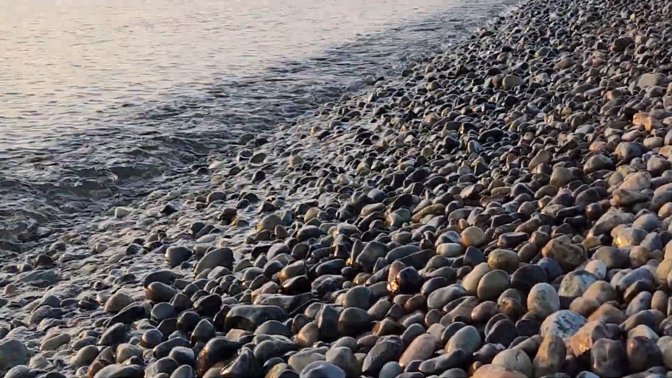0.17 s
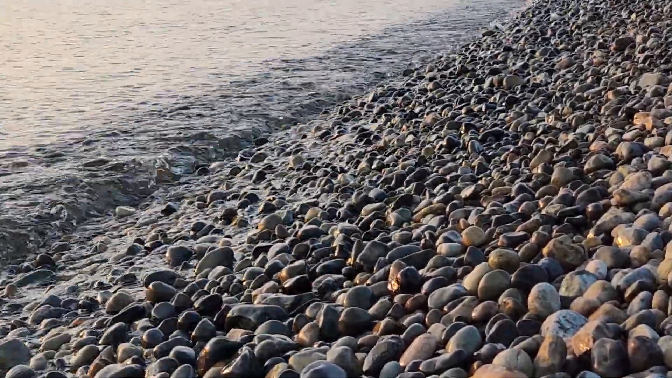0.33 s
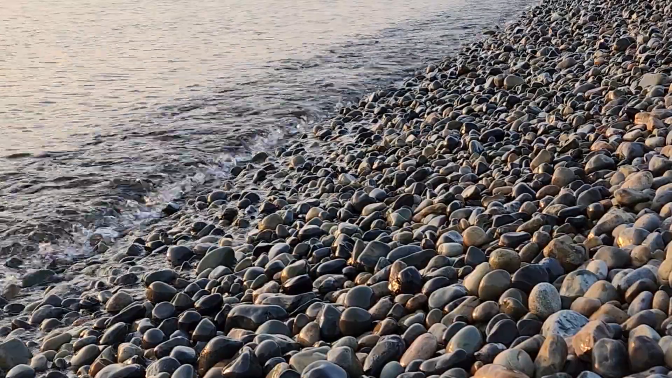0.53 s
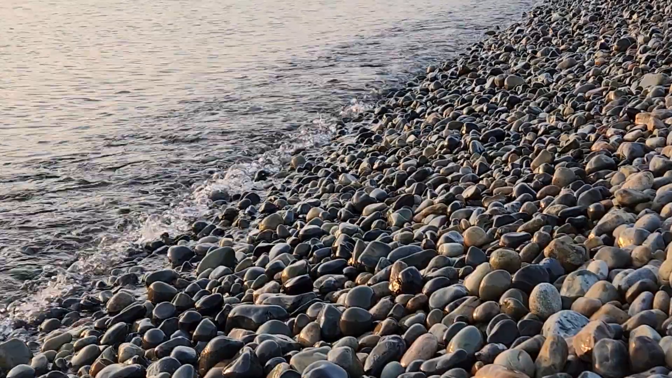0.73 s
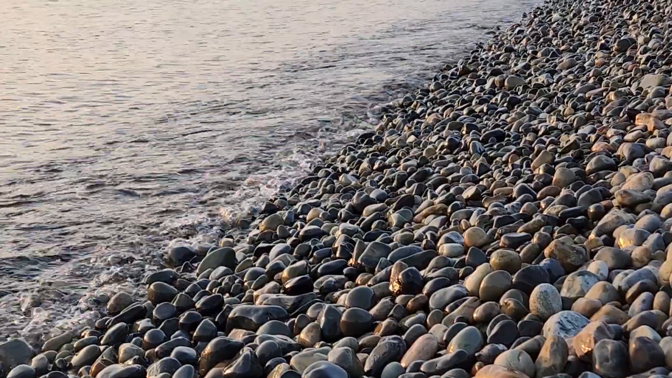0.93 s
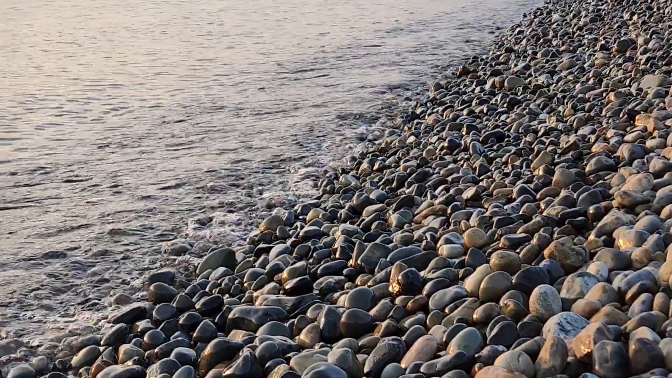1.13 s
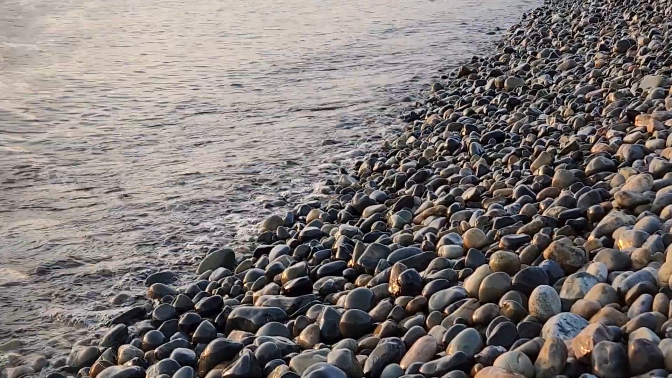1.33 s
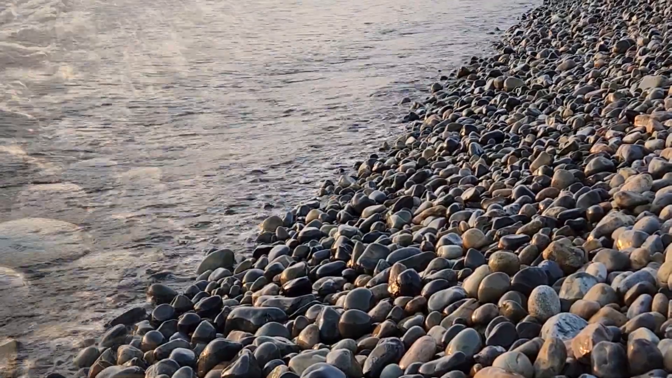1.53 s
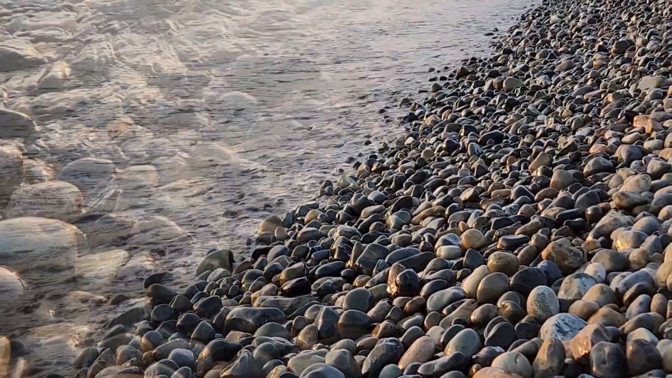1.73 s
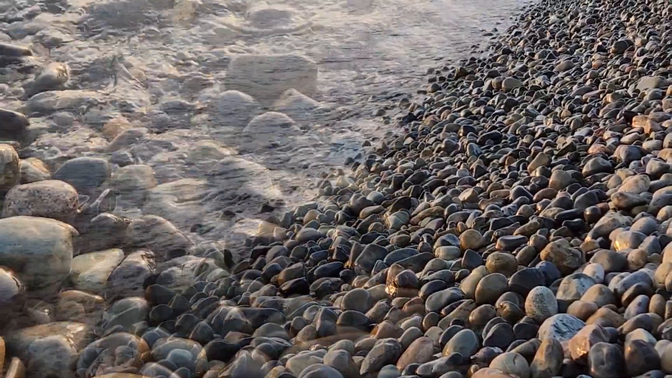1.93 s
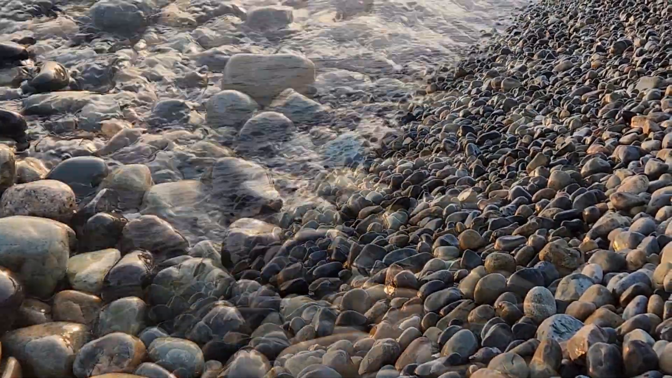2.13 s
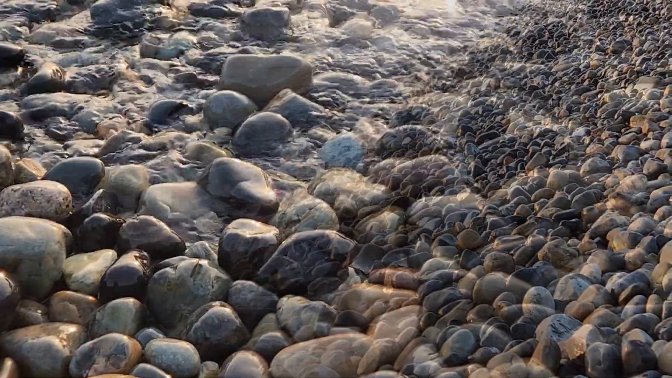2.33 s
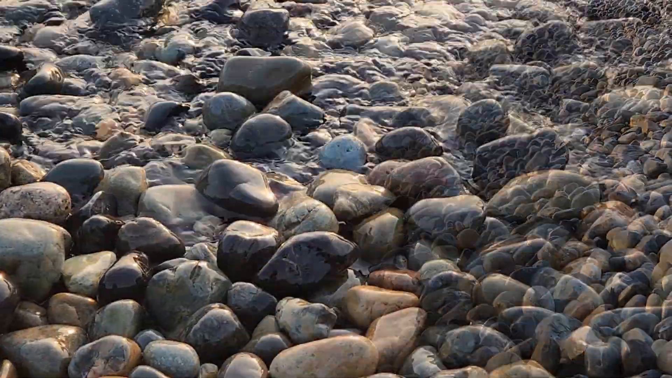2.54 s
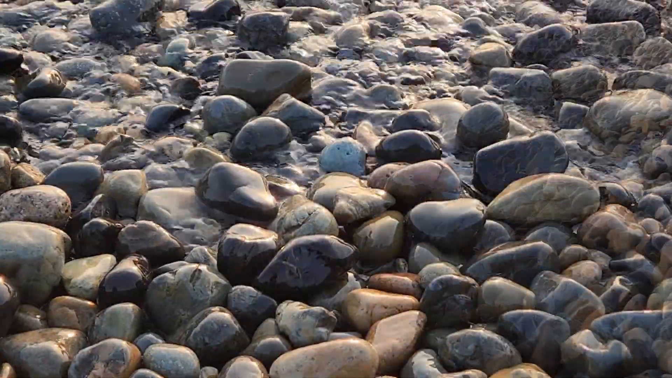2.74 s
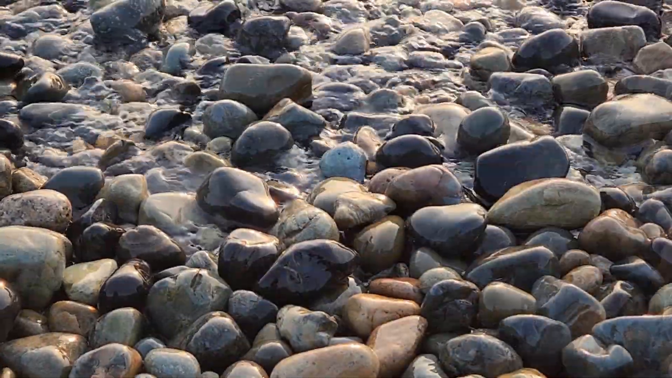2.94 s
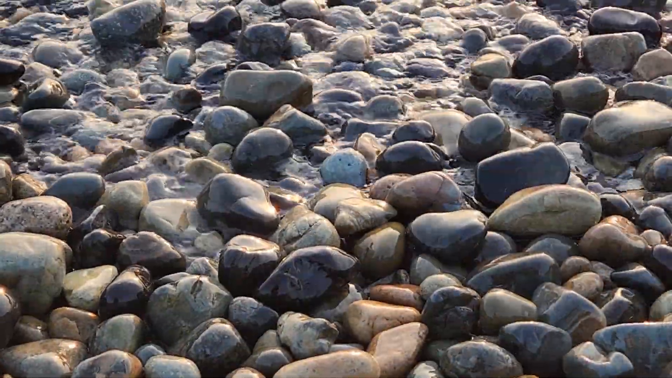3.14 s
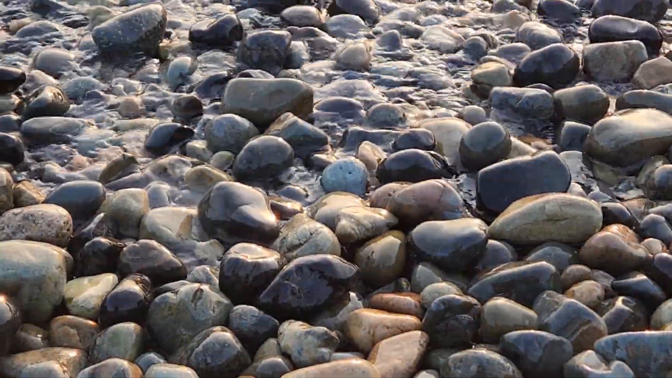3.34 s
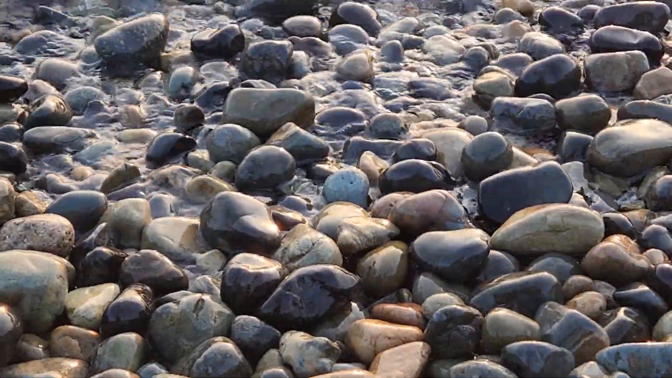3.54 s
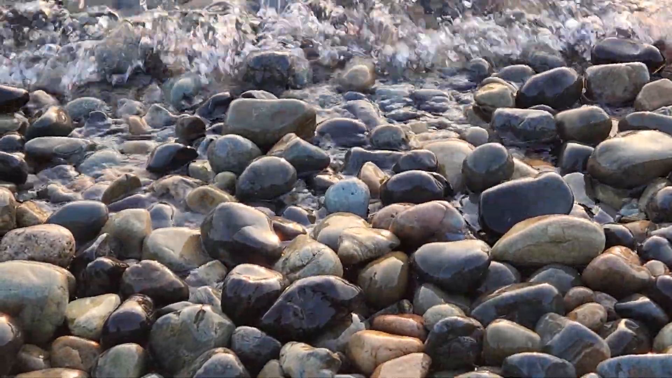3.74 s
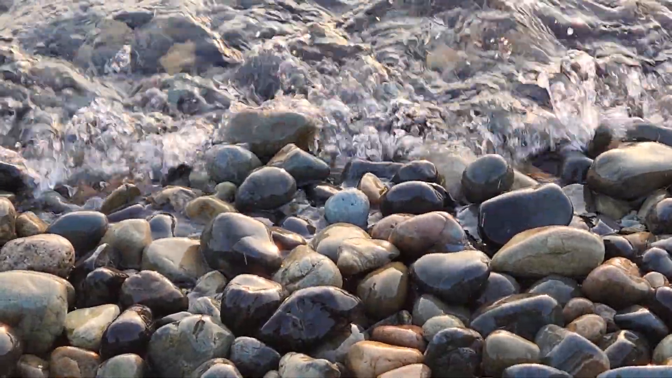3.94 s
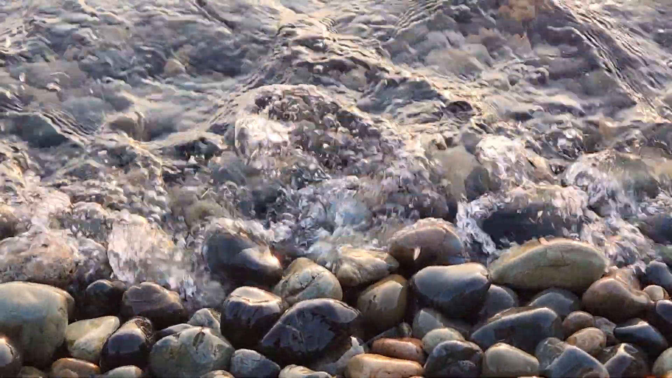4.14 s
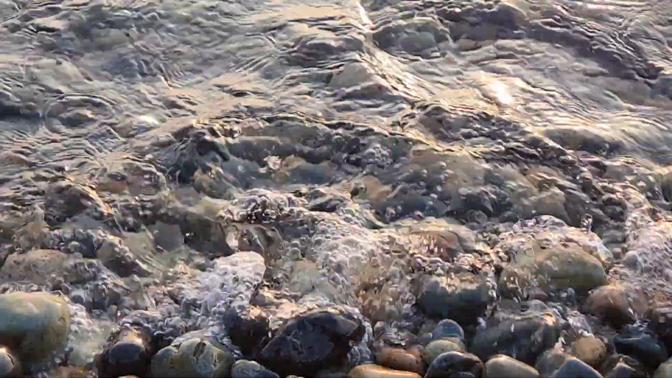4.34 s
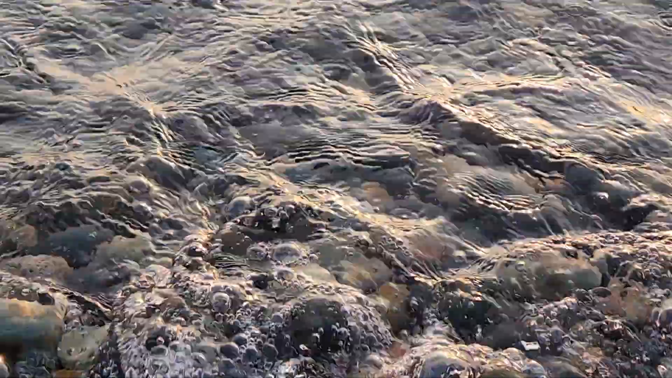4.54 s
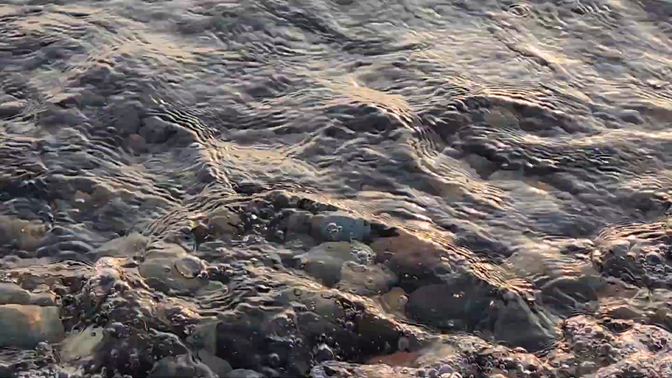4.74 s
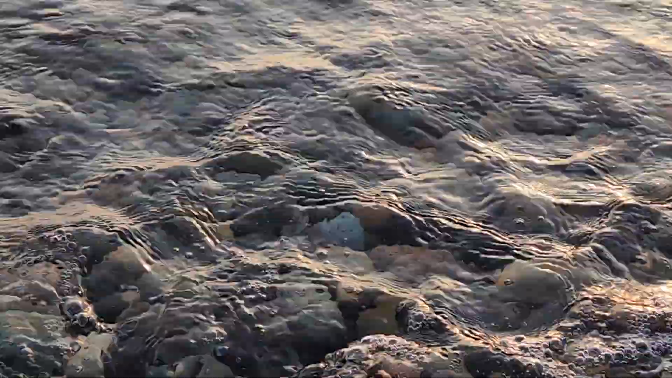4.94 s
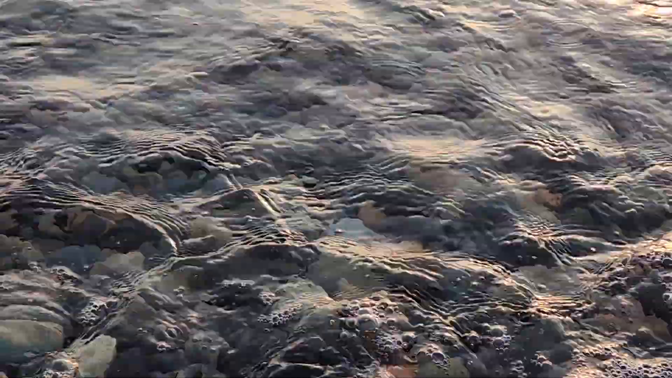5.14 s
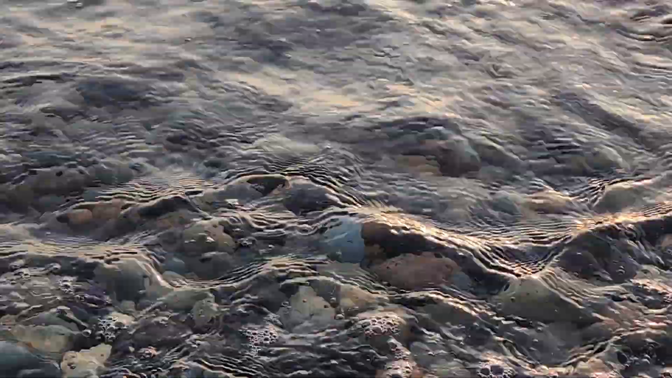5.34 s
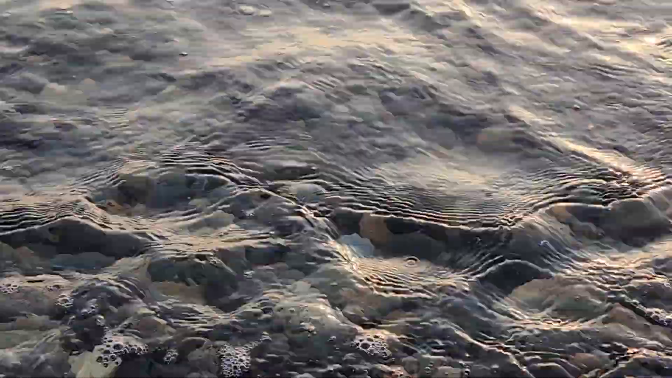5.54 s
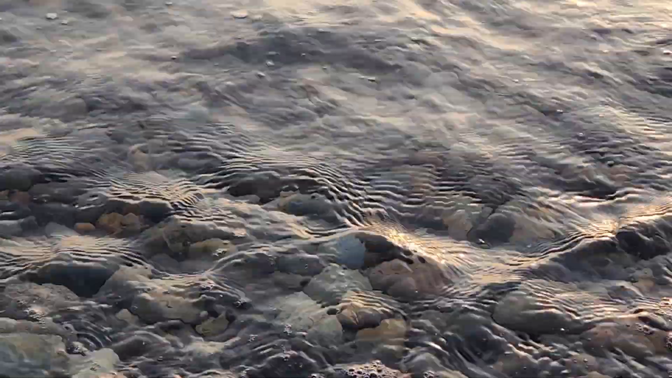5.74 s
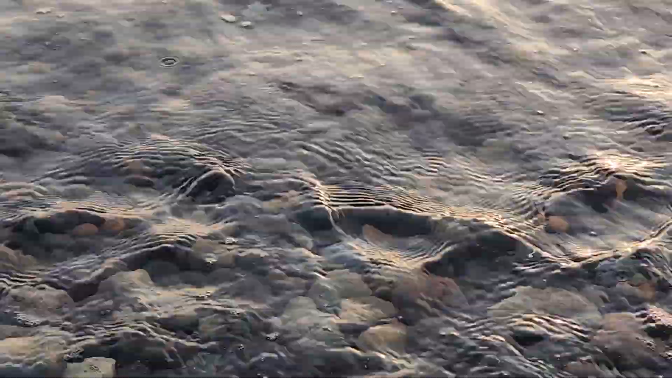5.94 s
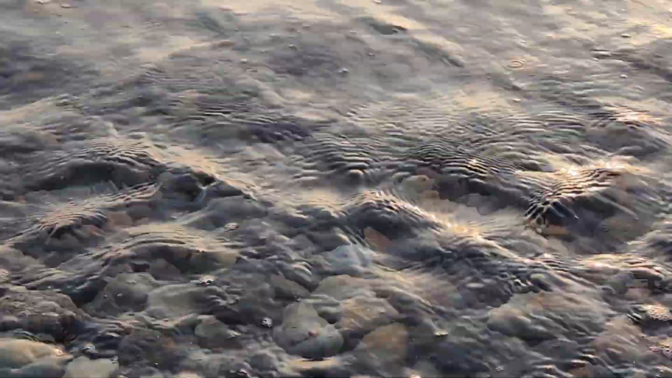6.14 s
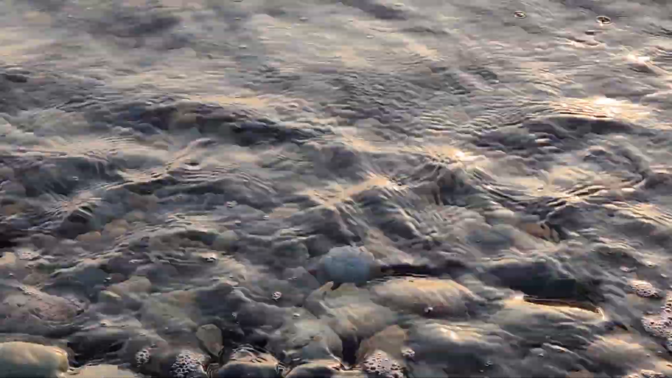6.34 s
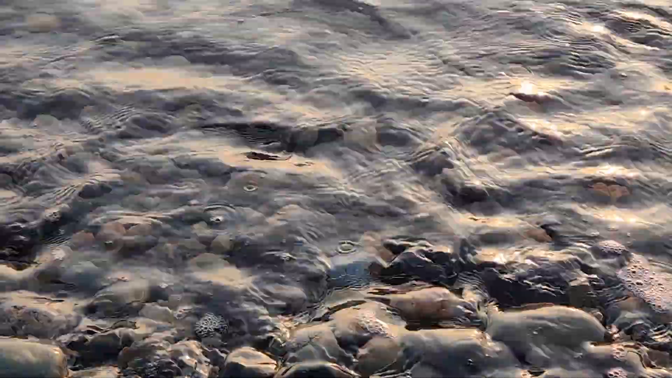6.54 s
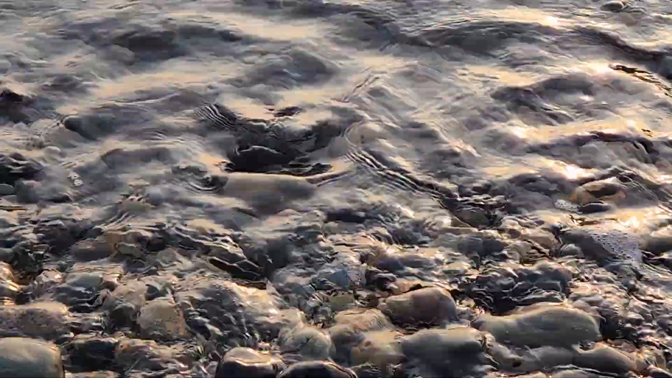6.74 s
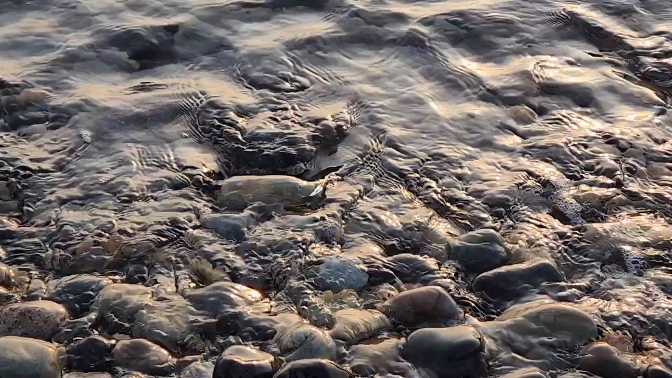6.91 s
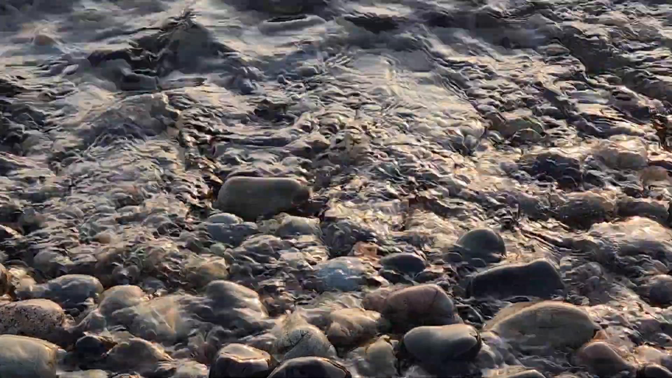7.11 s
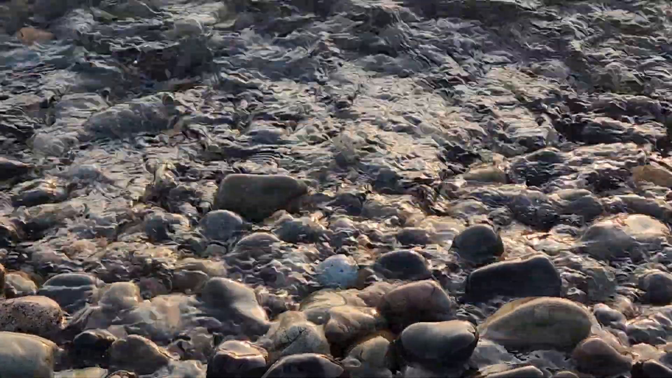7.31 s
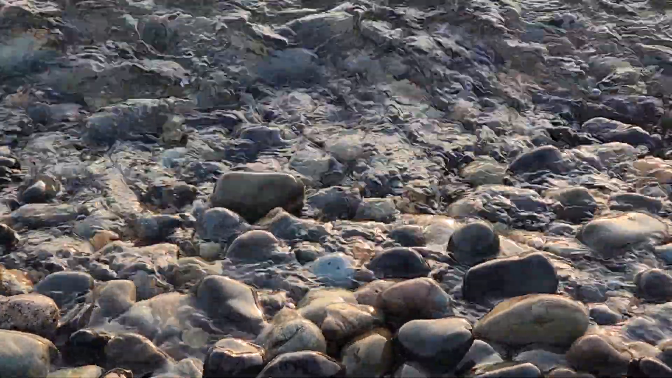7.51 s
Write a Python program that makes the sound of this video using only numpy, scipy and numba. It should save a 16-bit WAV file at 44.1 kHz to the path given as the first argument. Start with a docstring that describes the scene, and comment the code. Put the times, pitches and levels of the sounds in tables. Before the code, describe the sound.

Small waves on smooth stones, heard near the waterline outdoors. First a short bubbling wash, strongest just after half a second, then near quiet over soft rumble. Around three and a half seconds a stronger splash surges up, full of round plops, hard pebble clacks and crisp spray. Foam fizzes and thins out, leaving isolated knocks and a light trickle at the end.

```python
"""Two small waves break on a steep beach of round pebbles, run up and drain back, with far surf and one gust behind them.
Gurgle, fizz and spray are swarms of decaying, upward-gliding sines whose levels follow the waves.
Plops, pebble clacks and spray ticks use the same sines: the loudest at set moments, lesser plops, splashes, ticks by chance.
Far hiss, surf and gust are filtered noise. Two spaced ports pick it all up, with their own delays and responses."""
import sys
import numpy as np
from scipy import signal
from scipy.fft import rfft, irfft, next_fast_len
from scipy.io import wavfile
from scipy.ndimage import uniform_filter1d
from numba import njit

SR = 44100
rng = np.random.default_rng(int(sys.argv[2]) if len(sys.argv) > 2 else 0)


def store_pcm(level_fs):
    """Save levels as 16-bit WAV."""
    pcm = np.round(np.clip(level_fs, -1, 1) * 32767).astype(np.int16)
    wavfile.write(sys.argv[1], SR, np.atleast_2d(pcm).T)


N = 333837
PLOP_T60_S, TICK_S = 0.08, 0.016


def undb(db):
    """Gain of a dB value."""
    return 10 ** (np.asarray(db) / 20)


def unit(x):
    """Scaled to rms 1."""
    return x / np.sqrt(np.mean(x ** 2))


def on_log(table, hz):
    """Reads (f/Hz, level/dB) points on a log-frequency axis."""
    f, db = np.transpose(table)
    return np.interp(np.log(np.maximum(hz, 1)), np.log(f), db)


def colour(x, db_of):
    """Filters by a dB function of frequency."""
    n = next_fast_len(N)
    hz = np.arange(n // 2 + 1) * SR / n
    return irfft(rfft(x, n) * undb(db_of(hz)), n)[..., :N]


def walk(rate_hz):
    """Random levels held 1 / rate_hz s, smoothed by two moving averages; rms 1."""
    k = int(SR / rate_hz)
    steps = np.repeat(rng.standard_normal(N // k + 1), k)
    return unit(uniform_filter1d(uniform_filter1d(steps, k), k)[:N])


@njit
def ring(start, lead, hz, t60_s, rise, left, right, onset_cycles):
    """Sines that build up over onset_cycles, decay and glide up by the share rise; left hears them lead samples early."""
    out = np.zeros((2, N + 64))  # 32 samples of margin each side for the lead
    for g in range(len(start)):
        n = int(t60_s[g] * SR * 0.7)
        w = 2 * np.pi * hz[g] / SR
        step = np.exp(1j * w - np.log(1000) / (t60_s[g] * SR))
        glide = np.exp(1j * w * rise[g] / n)
        fade = np.exp(-hz[g] / SR / onset_cycles)
        z, hush = 1 + 0j, 1.0
        for i in range(start[g], min(start[g] + n, N)):
            z *= step
            step *= glide
            hush *= fade
            y = z.imag * (1 - hush)
            out[0, i + 32 - lead[g]] += left[g] * y
            out[1, i + 32] += right[g] * y
    return out[:, 32:N + 32]


def bearing(s, chance, shore, spread):
    """Lead at the left port in samples: the share shore comes from the busy stretch, the rest from across the front."""
    # bearing of the busiest stretch of shore: t/s, sine of angle to the left [1]
    busy_stretch = [(0, 0.87), (1.2, .91), (1.8, .76), (2.9, .76), (3.4, .88), (5.3, 0.91), (7, 0.87)]
    port_gap_s = 27 / SR
    shore = np.clip(shore, 0, 0.9)
    front = spread * np.cos(np.pi * (chance - shore) / (1 - shore))
    sine = np.where(chance < shore, np.interp(s, *np.transpose(busy_stretch)), front)
    return np.rint(port_gap_s * SR * np.clip(sine, -1, 1)).astype(np.int64)


def swarm(count, shape, cycles, rise, scatter_db, unlike_db, shore, spread):
    """Cloud of bubbles at random moments, pitches, sizes and directions; rms 1."""
    when, pitch, way, size, length = rng.random((count, 5)).T
    s = when * N / SR
    lowest_hz, highest_hz = shape[0][0], shape[-1][0]
    hz = lowest_hz * (highest_hz / lowest_hz) ** pitch
    t60_s = cycles * (0.5 + length) / hz
    # factor hz offsets the shorter ring and sparser spacing of high bubbles
    gain = hz * undb(on_log(shape, hz) - scatter_db * np.log(1 - size))
    side = undb(unlike_db * rng.standard_normal(count))
    start, lead = (when * N).astype(np.int64), bearing(s, way, shore, spread)
    return unit(ring(start, lead, hz, t60_s, np.full(count, rise), gain * side, gain / side, 0.76))


def singles(s, db, hz, t60_s, pan_db, rise, onset_cycles=0.3):
    """Bubbles or knocks heard one by one, close in front; pan_db is left minus right."""
    start, lead = (s * SR).astype(np.int64), bearing(s, rng.random(len(s)), shore=0, spread=0.12)
    left, right = undb(db + pan_db / 2), undb(db - pan_db / 2)
    return ring(start, lead, hz, t60_s, np.full(len(s), rise), left, right, onset_cycles)


def spatter(s, db, pan_db, low_hz, high_hz, length_s, count):
    """Each impact throws off a brief cluster of tiny bubbles, densest at its start."""
    late, pitch = rng.random((len(s), count, 2)).T
    hz = (low_hz * (high_hz / low_hz) ** pitch).ravel()
    moments_s = (s + length_s * late ** 2).ravel()
    return singles(moments_s, np.tile(db, count), hz, 14 / hz, np.tile(pan_db, count), rise=0.08)


def wash(s):
    """Gurgle, fizz and spray levels in dB at times s, set by the waves."""
    # water activity: t/s, gurgle level/dB, fizz level/dB, spray level/dB
    activity = [(0, -41, -39, -50), (.3, -39.5, -36, -44), (.6, -30.5, -28, -36.5), (.88, -33, -27.5, -42),
                (1.0, -42.5, -37.5, -48), (1.14, -47.5, -43.5, -57), (1.26, -47.5, -51, -60),
                (1.6, -56.5, -54.5, -57.5), (2.15, -54.5, -46.5, -59), (2.85, -49.5, -44.5, -56.5),
                (3.03, -42, -39.5, -52), (3.33, -41.5, -40, -53), (3.42, -37, -32, -39),
                (3.52, -21, -23, -31.5), (3.76, -19, -21.5, -32), (4.05, -22, -19.5, -29),
                (4.28, -24.5, -22.5, -29.5), (4.36, -28.5, -23, -33), (4.78, -33, -31, -40.5),
                (4.88, -42, -35, -44), (5.4, -47.5, -43, -50), (6.3, -53, -50.5, -51.5),
                (6.55, -53.5, -44, -48.5), (7.04, -51, -39.5, -49), (7.36, -50, -39.5, -50.5),
                (7.57, -45, -35, -44.5)]
    at_s, *columns = np.transpose(activity)
    return [np.interp(s, at_s, column) for column in columns]


def far_hiss():
    """Foam hissing further along the shore: smooth noise, part of it reaching the left port first."""
    # spectrum of the distant foam: f/Hz, density/(dB per Hz)
    hiss_colour = [(200, -30), (400, 3), (1000, -14), (2000, -5.5), (4000, 3.5), (6000, -6.5), (15000, -11)]
    level_db, lag_samples = -59.5, 24
    along, left, right = rng.standard_normal((3, N))
    pair = np.array([left + 0.9 * along, right + 0.95 * np.roll(along, lag_samples)])
    hiss = unit(colour(pair, lambda hz: on_log(hiss_colour, hz)))
    return hiss * undb(level_db + 0.58 * walk(0.77))


def rumble(pair):
    """Far surf: low noise at a steady level, with brief low thuds and a slower dip."""
    # spectrum of the rumble: f/Hz, density/(dB per Hz)
    surf_colour = [(12, -41), (20, -7), (48, 3), (91, 0.5), (121, -6.5), (150, -19), (220, -34.5),
                   (400, -50), (900, -82)]
    # low thuds, and one dip where negative: t/s, level over steady surf/dB, half width/s
    thuds = [(.06, 10, 0.035), (.36, -4, 0.49), (.71, 9, .1), (.97, 7.5, 0.074), (7.29, 5.5, .08)]
    s, level_db = np.arange(N) / SR, -30
    for at_s, db, half_s in thuds:
        level_db = level_db + db * np.maximum(0, 1 - abs(s - at_s) / half_s)
    return unit(colour(pair, lambda hz: on_log(surf_colour, hz))) * undb(level_db)


def heave(pair):
    """Water heaving among the stones: noise mostly above the rumble."""
    # heave level: t/s, level/dB
    heave_levels = [(0.0, -46), (0.36, -46.5), (0.55, -44), (1.79, -52), (3.42, -41), (3.58, -40.5),
                    (4.74, -38), (5.92, -44.5), (7.57, -46.5)]
    heave_colour = [(90, -12), (150, 1), (240, -3), (380, -9.5), (800, -45.5)]  # f/Hz, level/dB
    noise = unit(colour(pair, lambda hz: on_log(heave_colour, hz)))
    return noise * undb(np.interp(np.arange(N) / SR, *np.transpose(heave_levels)))


def surf():
    """Rumble and heave from one noise pair, nearly alike at both ports, less so towards the top."""
    mid, side = rng.standard_normal((2, N))
    side_colour = [(30, -13), (70, -18.5), (140, -13.5), (280, -8.5), (700, 3)]  # f/Hz, level/dB
    side = colour(side, lambda hz: on_log(side_colour, hz))
    pair = mid + side * np.array([[1], [-1]])
    return rumble(pair) + heave(pair)


def gust():
    """Turbulence at each port: low noise, unrelated left and right, in one brief gust."""
    start_s, attack_s, hold_s, release_s = 0.583, 0.07, 0.16, 0.12  # attack and release span 46 dB
    level_db = -23
    gust_colour = [(20, -14), (60, 10), (150, 4.5), (400, -36), (2000, -70)]  # f/Hz, level/dB
    air = colour(rng.standard_normal((2, N)), lambda hz: on_log(gust_colour, hz))
    since_s = np.arange(N) / SR - start_s
    away = np.maximum(0, np.maximum(-since_s / attack_s, (since_s - hold_s) / release_s))
    return unit(air) * undb(level_db - 46 * away)


def strays(count, above_db, scatter_db, pan_db):
    """Chance moments, each with a level over the wash, a pitch share and a side."""
    when, size, pitch, side = rng.random((count, 4)).T
    return when * N / SR, above_db - scatter_db * np.log(1 - size), pitch, pan_db * (2 * side - 1)


def scattered():
    """Lesser plops, splashes and ticks at chance moments, as strong as the water is busy."""
    s, db, pitch, pan_db = strays(count=200, above_db=-1.5, scatter_db=2.0, pan_db=4)
    t60_s = np.full(len(s), PLOP_T60_S)
    small_plops = singles(s, wash(s)[0] + db, 350 * 3.8 ** pitch, t60_s, pan_db, rise=0.13, onset_cycles=1.7)
    s, db, pitch, pan_db = strays(count=400, above_db=-1.5, scatter_db=2.5, pan_db=10)
    low_hz, high_hz = 1200 + 1800 * pitch, 2200 + 3000 * pitch
    splashes = spatter(s, wash(s)[1] + db, pan_db, low_hz, high_hz, length_s=0.0065, count=6)
    s, db, pitch, pan_db = strays(count=200, above_db=-13, scatter_db=4.0, pan_db=2)
    low_hz, high_hz = 4000 + 4000 * pitch, 9000 + 8000 * pitch
    small_ticks = spatter(s, wash(s)[2] + db, pan_db, low_hz, high_hz, TICK_S, count=28)
    return small_plops + splashes + small_ticks


def ticks():
    """Drops of spray landing near: each is all splash, a cluster of tiny bubbles."""
    # spray drops: t/s, level/dB, middle pitch f/Hz, left minus right/dB
    drops = [(0.2566, -35, 5900, 2), (0.5463, -31, 7200, 5.5), (0.7488, -25, 7260, 9),
             (0.838, -30, 5660, 10), (1.059, -37, 5630, 7.0), (1.1019, -40, 7040, 8),
             (1.1313, -41, 8190, 5.0), (2.149, -37.5, 5600, -6), (2.2972, -44, 5560, -5),
             (2.5666, -48, 5520, 4), (2.7222, -32.5, 7400, -7), (2.8549, -41, 7680, 0.5),
             (2.9417, -36, 5630, -3), (3.0155, -38, 11600, 0), (3.1094, -39, 6600, 1),
             (3.1443, -39, 7180, -3), (3.255, -42, 6330, 3), (3.4036, -32, 6420, 3),
             (3.4797, -26, 5510, -2), (3.5882, -22, 8320, -3), (3.7673, -29, 12000, 1),
             (4.0507, -18, 6630, -4), (4.136, -14, 6620, -2), (4.374, -24, 5530, -1),
             (4.4343, -20, 12800, -6), (4.473, -21, 7350, -2), (4.5114, -19, 6450, -5),
             (4.5518, -18.5, 9080, -3), (4.588, -15.5, 9120, -6), (4.6266, -25, 7290, -5),
             (4.6618, -23, 12000, -6), (4.6962, -21.5, 10500, -3), (4.7731, -27, 8900, -1),
             (4.8249, -28, 12500, -2), (4.907, -23, 5550, -1), (4.9761, -34, 7070, 1.0),
             (5.0539, -36, 6690, 8), (5.1716, -40, 12400, -3)]
    s, db, hz, pan_db = np.transpose(drops)
    return spatter(s, db, pan_db, 0.58 * hz, 1.37 * hz, TICK_S, count=28)


def clacks():
    """Pebbles knocking: each is a low ring with a brighter resonance of the ports above it, in a splash."""
    # knocks: t/s, ring level/dB, ring f/Hz, resonance f/Hz, resonance level/dB, left minus right/dB
    knocks = [(0.215, -33.5, 1480, 4280, -39, 1.0), (0.4058, -25, 1850, 3290, -20.5, 2.5),
              (0.4428, -25, 1420, 2970, -17, 0.5), (0.7852, -12, 1840, 3230, -38, -1.0),
              (0.9934, -24, 1550, 3010, -35, -0.5), (1.0754, -27, 1850, 3020, -39, -3),
              (1.1548, -25.5, 2140, 2700, -45, -4), (1.3219, -34, 2000, 2620, -42, 2.0),
              (2.0383, -27.5, 1800, 3320, -39, 3.0), (2.2977, -48, 1980, 4640, -28, -8),
              (2.6589, -30, 2260, 3710, -34, 1.5), (2.9344, -31, 1480, 4880, -30, -2.0),
              (3.4146, -16, 2250, 3580, -28, 0.5), (3.4585, -20, 2560, 2600, -25, 6),
              (3.757, -20, 2130, 2900, -17, 3), (3.917, -12, 1480, 3810, -23, 0.5),
              (4.0711, -24, 2040, 3300, -11, 3), (4.1669, -8, 2140, 3030, -22, 8),
              (4.229, -10, 1890, 3530, -9.5, 4), (4.3086, -21, 2000, 3720, -21, 1.0),
              (4.4218, -12, 1670, 3010, -29.5, 4), (4.5126, -10, 1710, 5000, -28, 7),
              (4.5836, -22.5, 1390, 3300, -10.5, 3), (4.7865, -21, 1380, 3650, -24, 3.0),
              (4.9192, -25, 2250, 3230, -33, 3.0), (5.0344, -28, 2030, 3380, -43, 0.0),
              (5.7145, -23, 1830, 4440, -32, -0.5), (5.7798, -28, 2100, 3630, -39, -0.5),
              (6.8463, -29, 1650, 4160, -44, -0.5), (6.9804, -41, 2190, 2980, -29, 2),
              (7.0254, -22, 2160, 3180, -30, -1.0), (7.0534, -36.5, 1970, 3400, -27, 3),
              (7.0773, -20, 2060, 3290, -27, -6), (7.1844, -27, 2000, 4430, -18, 3.5),
              (7.3094, -35, 2040, 3040, -27.5, 1), (7.44, -32, 1440, 2780, -35, 0.5)]
    s, ring_db, ring_hz, resonance_hz, resonance_db, pan_db = np.transpose(knocks)
    low_ring = singles(s, ring_db, ring_hz, 30 / ring_hz, pan_db, rise=0.043, onset_cycles=0.85)
    resonance = singles(s, resonance_db, resonance_hz, 45 / resonance_hz, pan_db, rise=0.081, onset_cycles=1.3)
    low_hz, high_hz = 0.63 * resonance_hz, 1.6 * resonance_hz
    splash = spatter(s, resonance_db - 7.0, pan_db, low_hz, high_hz, length_s=0.0068, count=8)
    return low_ring + resonance + splash


def plops():
    """Big bubbles glide up as they ring, and each sheds a smaller, higher one."""
    # big bubbles: t/s, level/dB, starting pitch f/Hz, left minus right/dB
    bubbles = [(0.112, -30.5, 616, -2), (0.339, -23, 360, 5), (0.413, -21, 550, -4), (0.447, -28, 548, 0.0),
               (0.534, -22.5, 467, 3), (0.641, -20.5, 1046, -9), (0.703, -27, 556, -4),
               (2.662, -37, 660, -1.0), (2.967, -29.5, 348, 4), (3.036, -22.5, 264, 2.0),
               (3.068, -28.5, 1246, -1), (3.182, -34, 345, 5), (3.454, -20, 681, 0.0),
               (3.502, -12.5, 513, 0.0), (3.563, -15.5, 678, -0.5), (3.643, -26, 501, -2),
               (3.699, -16, 704, -3), (3.748, -10.5, 864, -1), (3.779, -15, 883, 1.0),
               (3.828, -18, 1280, 1.5), (3.854, -15, 310, 6), (3.882, -13, 495, 5.5), (3.919, -11, 800, -2),
               (4.029, -13.5, 952, -6), (4.177, -16.5, 764, 1), (4.275, -10.5, 530, 0.5),
               (4.314, -17, 314, 5), (4.455, -18, 866, 3.5), (4.481, -16, 548, -3), (4.524, -18, 1256, 4),
               (4.643, -19, 886, 0.5), (4.962, -32, 283, 0.0), (7.02, -35, 1350, 3.0),
               (7.399, -26.5, 682, 1), (7.463, -28, 682, 0.0), (7.509, -32, 736, 1.5),
               (7.549, -37, 1325, 1.5)]
    s, db, hz, pan_db = np.transpose(bubbles)
    t60_s = np.full(len(s), PLOP_T60_S)
    big = singles(s, db, hz, t60_s, pan_db, rise=0.132, onset_cycles=1.5)
    late, smaller = rng.random((len(s), 2)).T
    shed_s, shed_hz = s + 0.036 * late, hz * (1.1 + 0.5 * smaller)
    shed = singles(shed_s, db - 2.5, shed_hz, 0.79 * t60_s, pan_db, rise=0.194, onset_cycles=4.2)
    return big + shed


def spray():
    """Patter of very many high, short grains from across the front."""
    # grain strength: f/Hz, density/(dB per Hz)
    spray_shape = [(4000, 5.5), (6000, 1), (8500, -0.5), (10500, -11), (12500, -1.5), (15000, -1)]
    return swarm(count=150000, shape=spray_shape, cycles=7.6, rise=0.045,
                 scatter_db=2.1, unlike_db=5.5, shore=0.27, spread=0.97)


def fizz():
    """Foam bubbles, mostly from the busy stretch, with fewer, longer-ringing drips standing out."""
    # grain strength: f/Hz, density/(dB per Hz)
    fizz_shape = [(800, 2), (1300, -2), (2000, 2.5), (3200, -5), (4500, -6.5), (6500, -30)]
    foam = swarm(count=50000, shape=fizz_shape, cycles=35.5, rise=0.25,
                 scatter_db=1.5, unlike_db=2.0, shore=0.62, spread=0.7)
    drips = swarm(count=3500, shape=fizz_shape, cycles=94.0, rise=0.26,
                  scatter_db=3.0, unlike_db=4.5, shore=0.45, spread=0.7)
    return foam + undb(-8.0) * drips


def gurgle():
    """Trapped air: low bubbles gliding up, mostly ahead."""
    # grain strength: f/Hz, density/(dB per Hz)
    gurgle_shape = [(220, -16.5), (350, -9.5), (600, -1), (900, -6), (1300, -9)]
    return swarm(count=11000, shape=gurgle_shape, cycles=26.3, rise=0.38,
                 scatter_db=1.0, unlike_db=2.0, shore=0.25, spread=0.58)


def water():
    """Gurgle, fizz and spray follow the waves and surge together in quick bursts."""
    gurgle_db, fizz_db, spray_db = wash(np.arange(N) / SR)
    surge = walk(9)
    mix = gurgle() * undb(gurgle_db + 1.1 * surge)
    mix += fizz() * undb(fizz_db + 0.77 * surge + 0.77 * walk(40))
    mix += spray() * undb(spray_db + 0.97 * surge + 1.4 * walk(45))
    pan_db = -1.8  # left minus right
    return mix * undb(np.array([[pan_db], [-pan_db]]) / 2)


def scene():
    """Near water, plops, clacks and ticks over far hiss, surf and wind."""
    background = far_hiss() + surf() + gust()
    return background + scattered() + ticks() + clacks() + plops() + water()


def record(dry):
    """The two ports colour the sound differently and pass no infrasound; the top is cut."""
    # response of each port in its housing: f/Hz, level/dB
    left_port = [(1100, 0.5), (1480, 4.5), (1700, 1), (2100, 1.5), (2500, 0.5), (3000, 5.5), (3700, 3),
                 (4200, 2), (5800, 1), (7500, 4), (9800, 5.5), (10800, 5), (12800, 7), (13700, 3)]
    right_port = [(200, 0.5), (500, -1.5), (1200, -2.5), (1540, 4.5), (1850, -2.5), (2300, -1), (2750, -5),
                  (3250, 1), (3700, -2), (4500, 0), (5800, -1), (10300, 0.5), (11800, 5), (14000, -1)]
    top_hz = 15900
    ports = colour(dry, lambda hz: np.array([on_log(left_port, hz), on_log(right_port, hz)]))
    ports = signal.sosfilt(signal.butter(2, 15, "high", fs=SR, output="sos"), ports)
    return signal.sosfilt(signal.ellip(10, 0.2, 80, top_hz, fs=SR, output="sos"), ports)


dry = scene()
out = record(dry)
store_pcm(out)
```